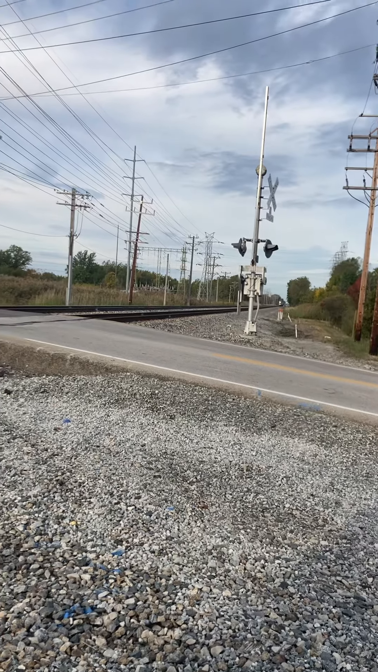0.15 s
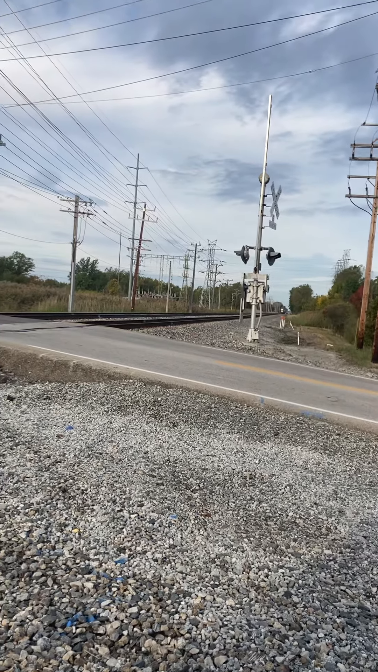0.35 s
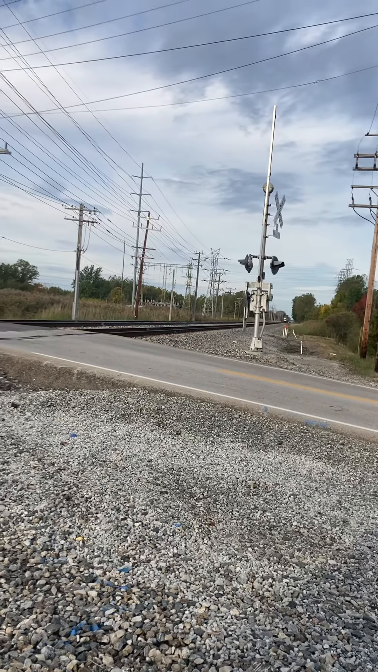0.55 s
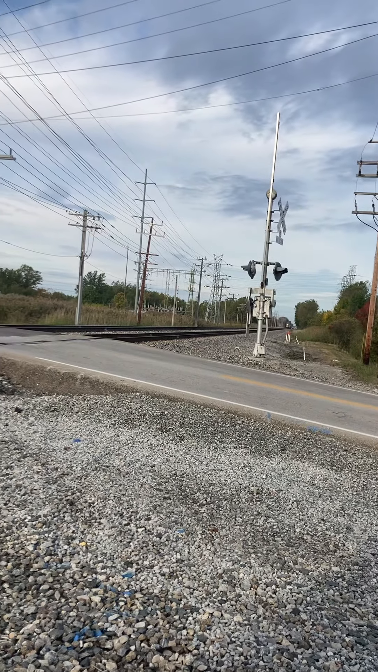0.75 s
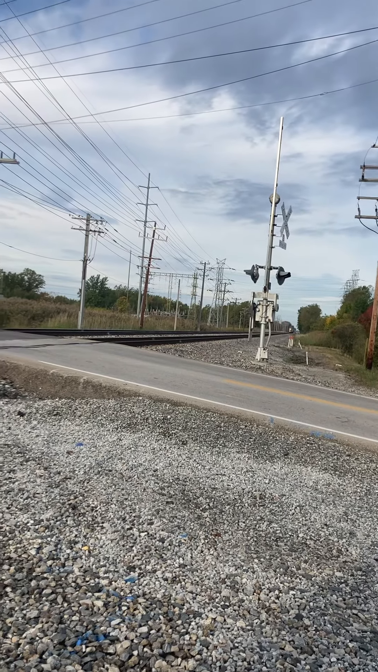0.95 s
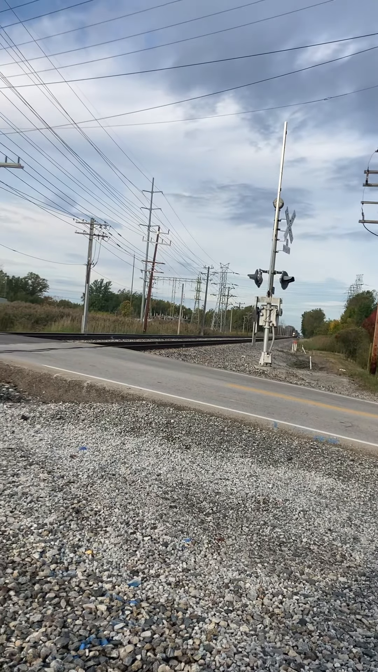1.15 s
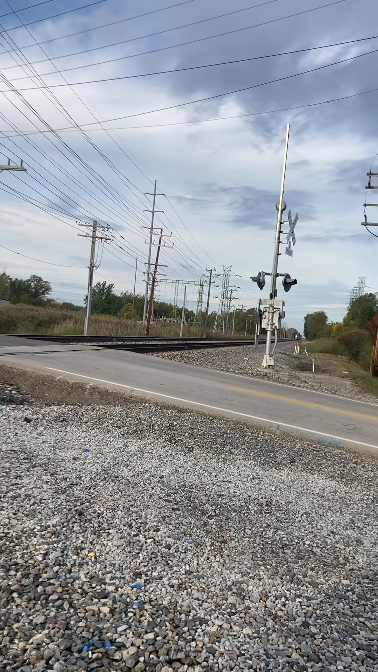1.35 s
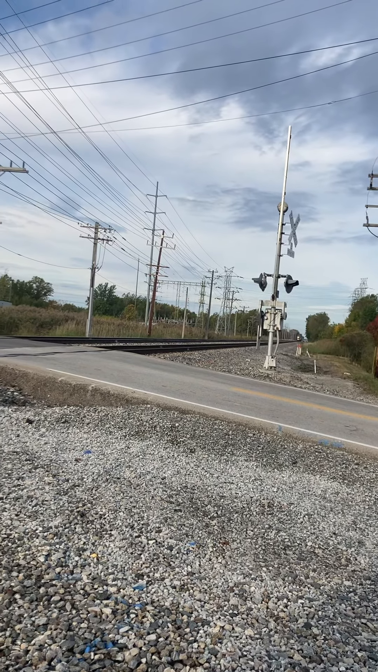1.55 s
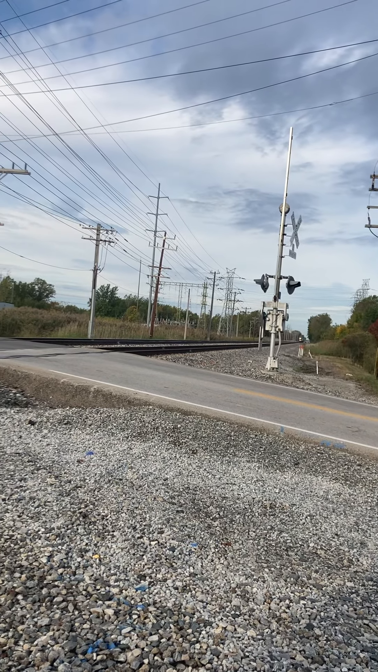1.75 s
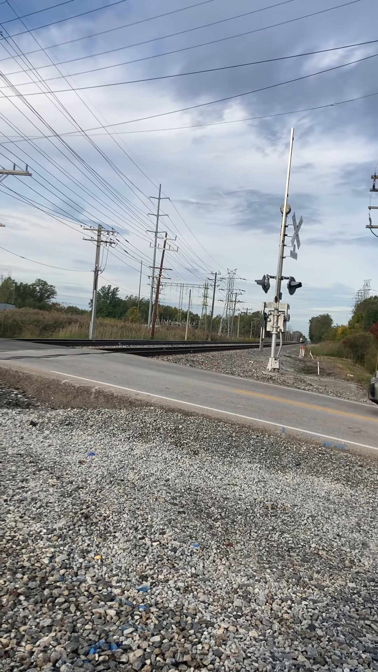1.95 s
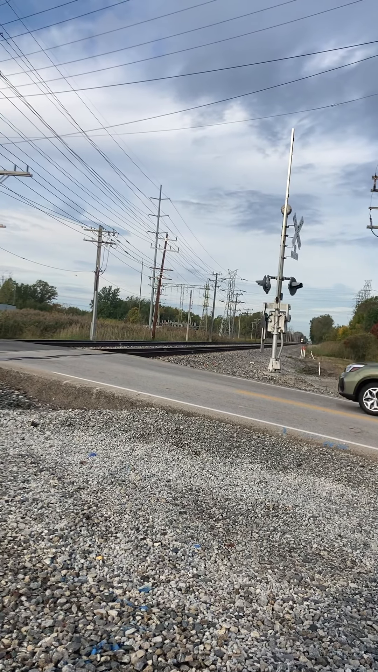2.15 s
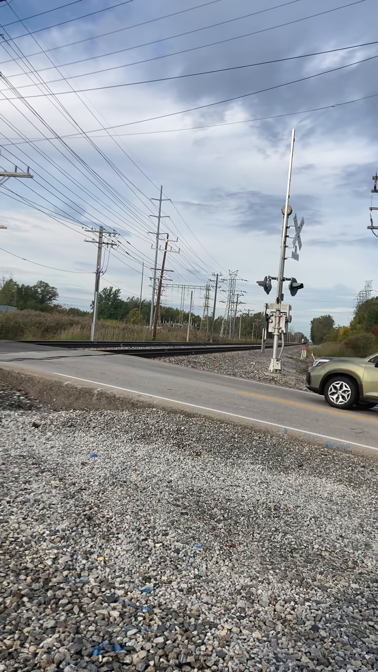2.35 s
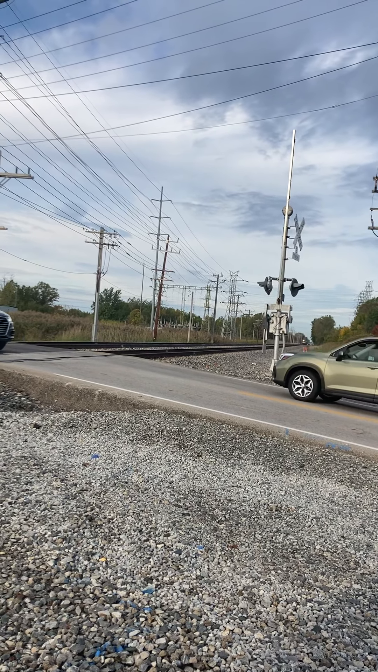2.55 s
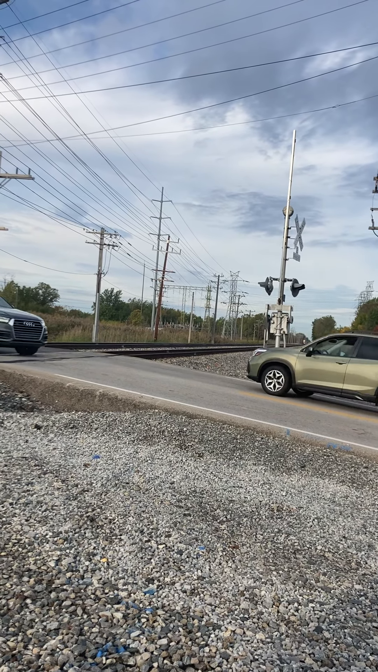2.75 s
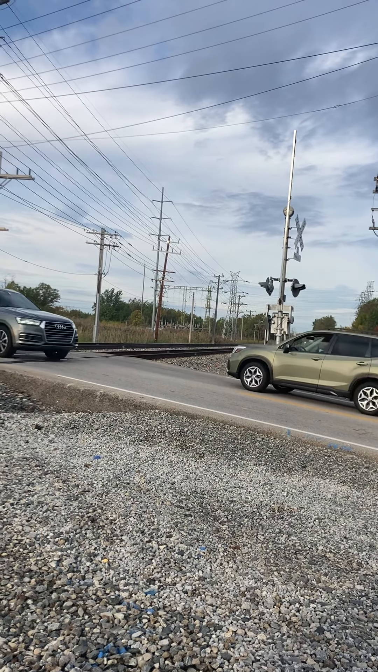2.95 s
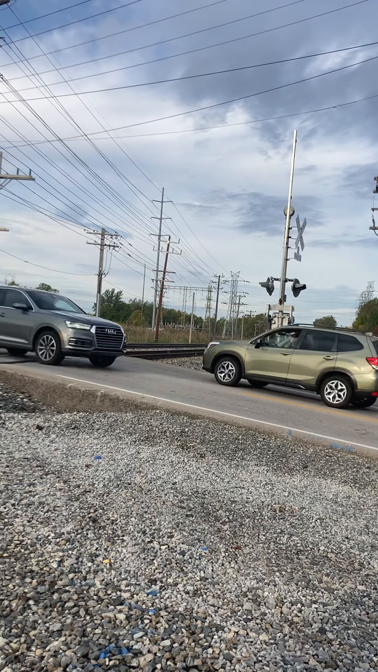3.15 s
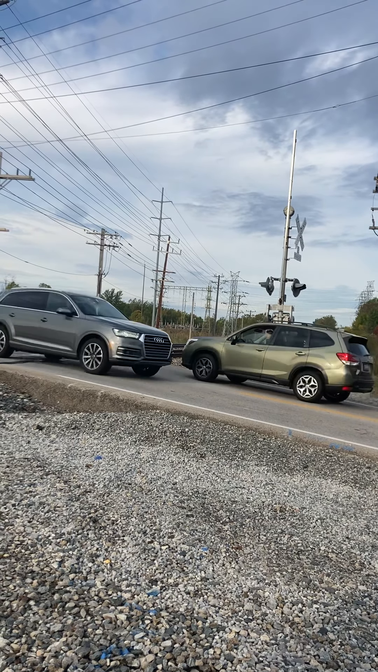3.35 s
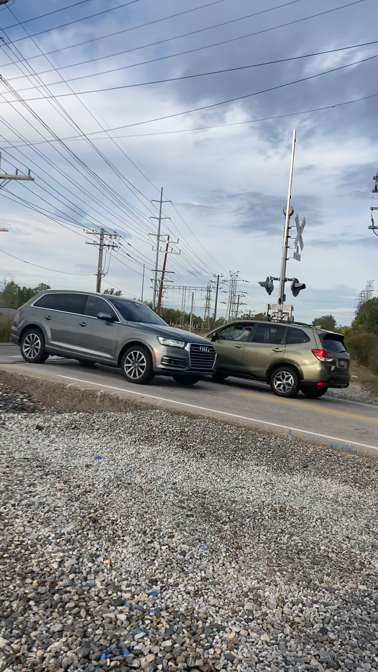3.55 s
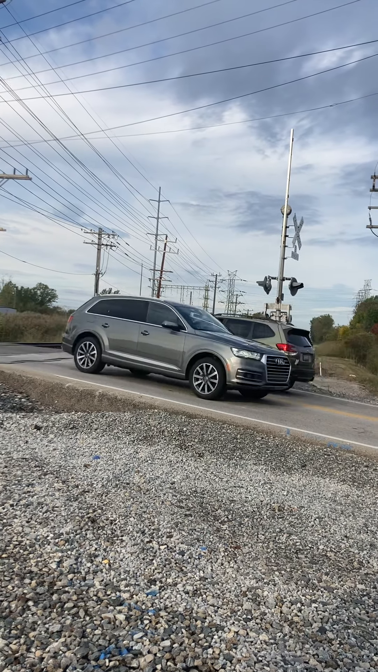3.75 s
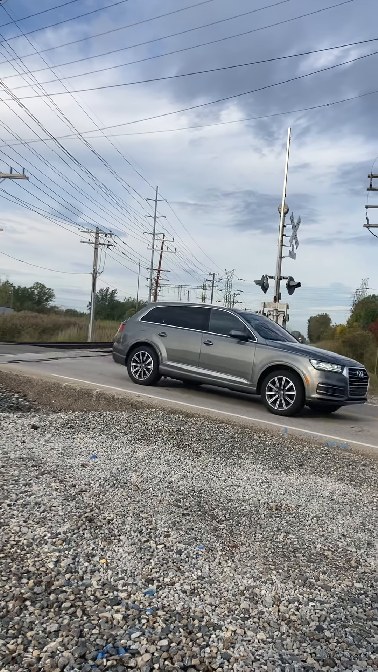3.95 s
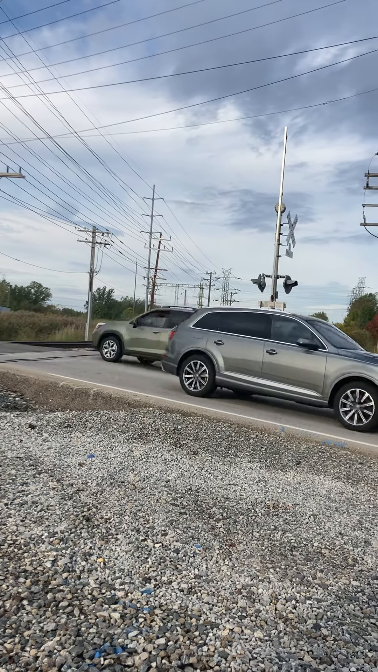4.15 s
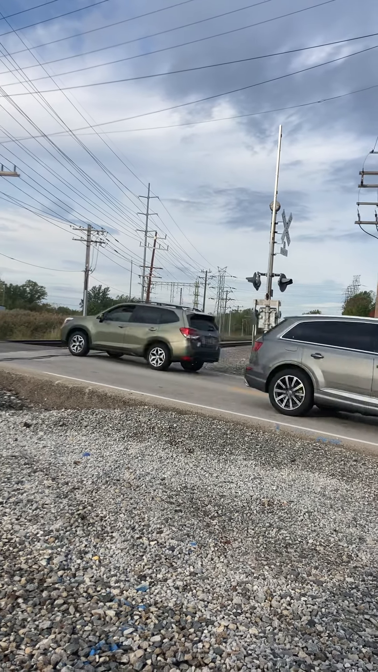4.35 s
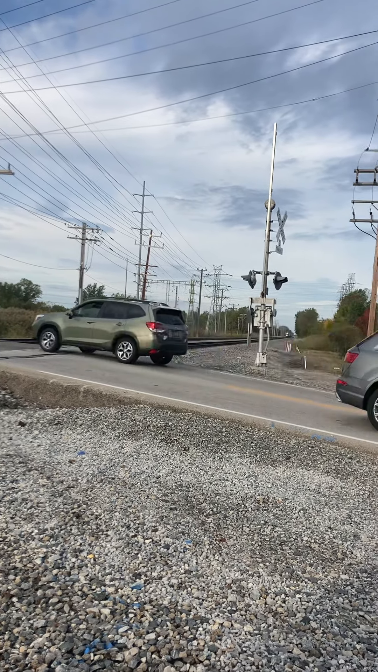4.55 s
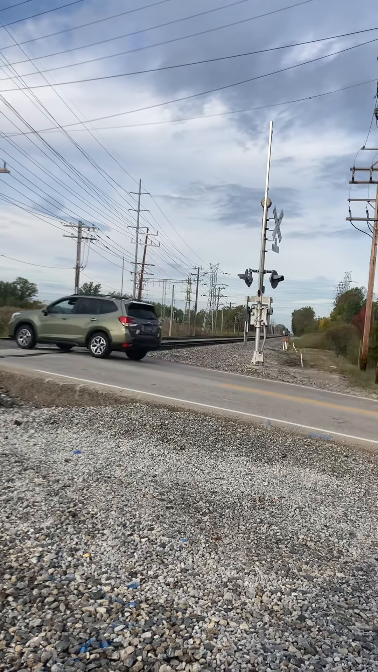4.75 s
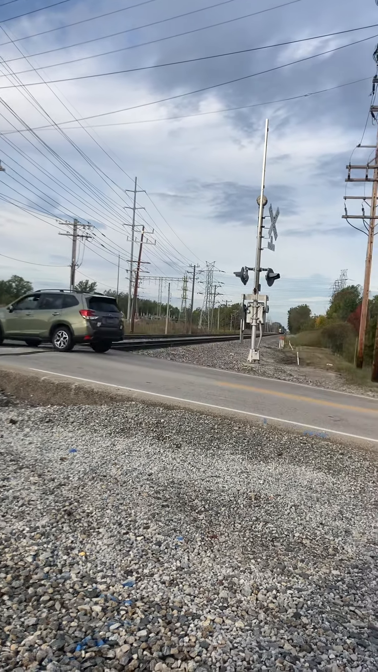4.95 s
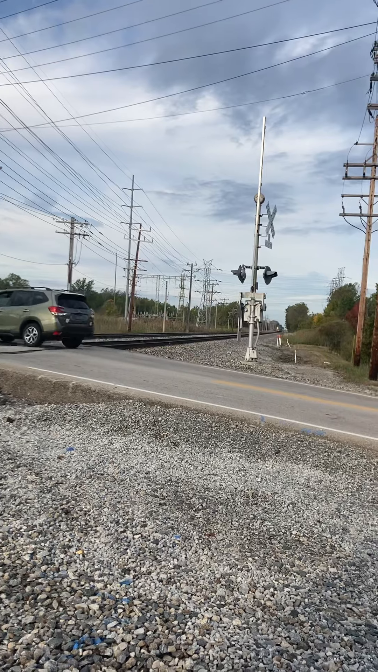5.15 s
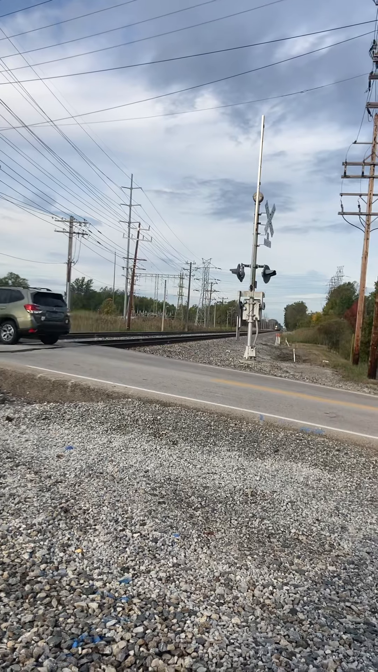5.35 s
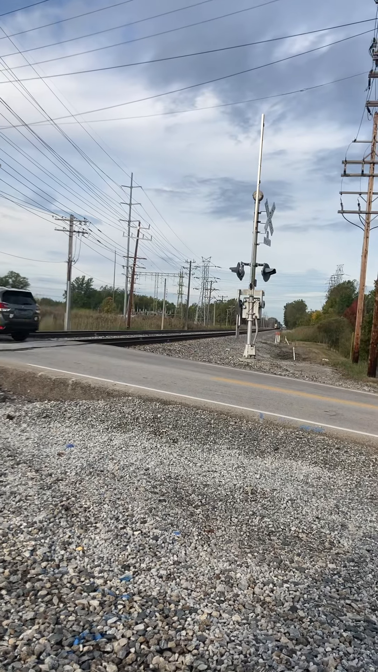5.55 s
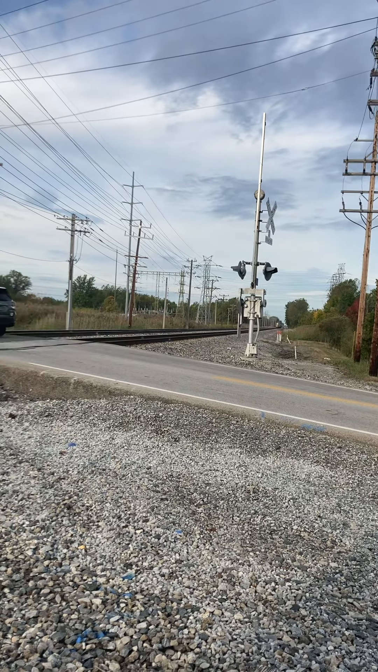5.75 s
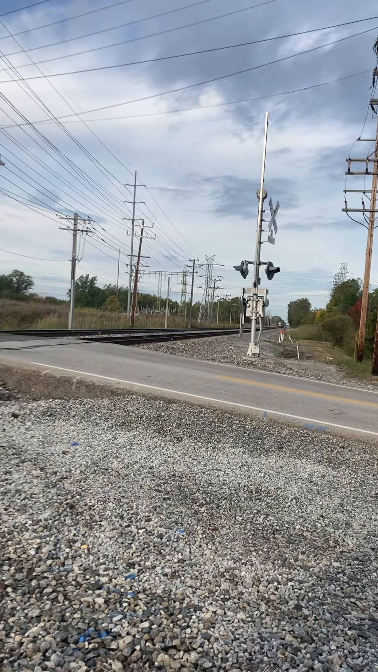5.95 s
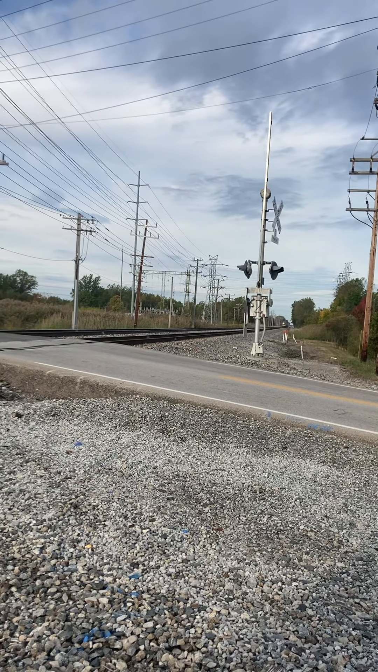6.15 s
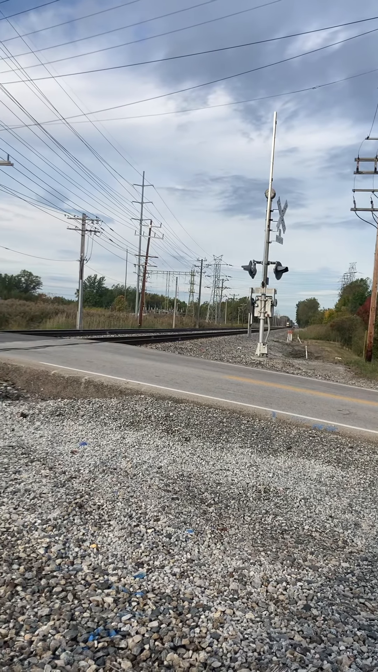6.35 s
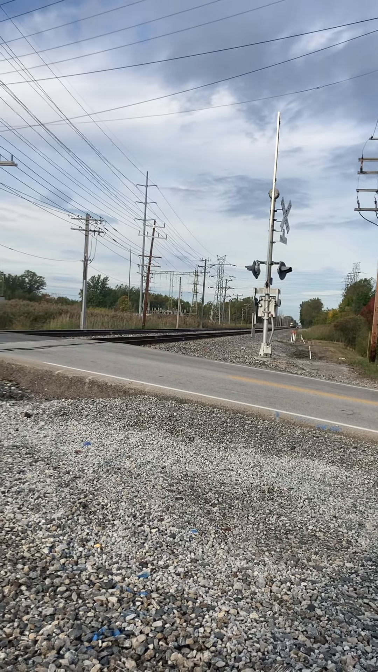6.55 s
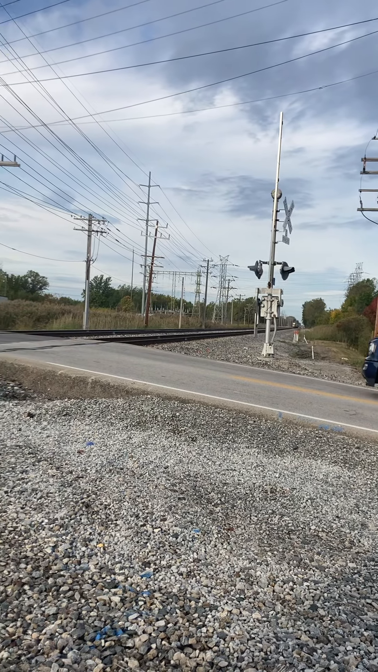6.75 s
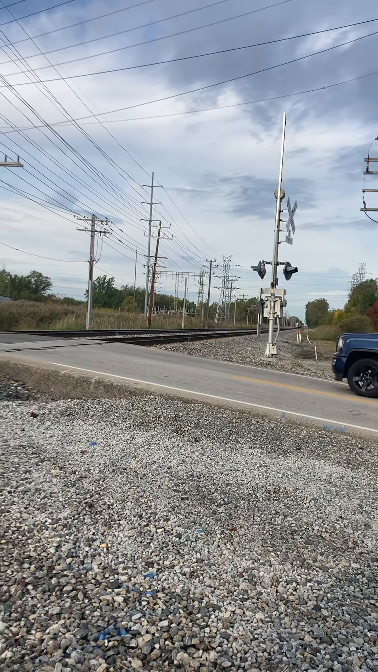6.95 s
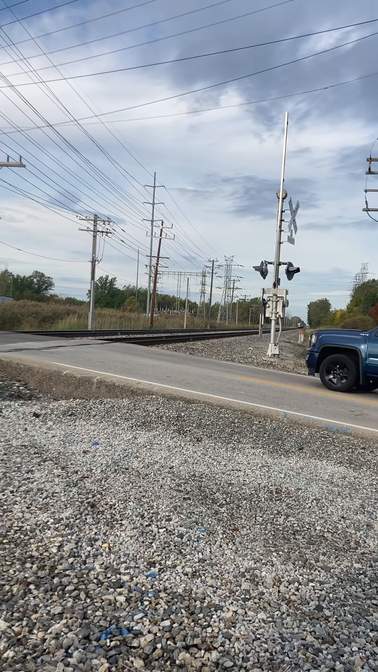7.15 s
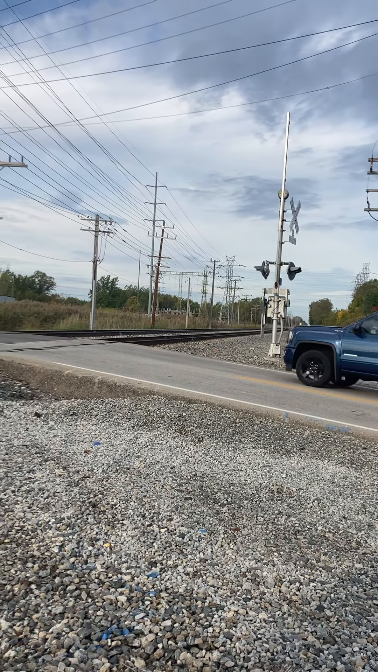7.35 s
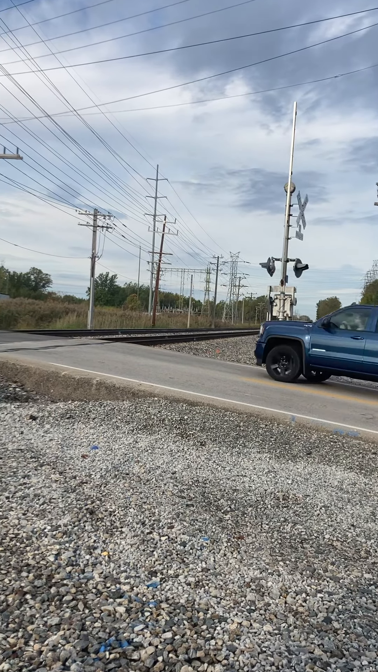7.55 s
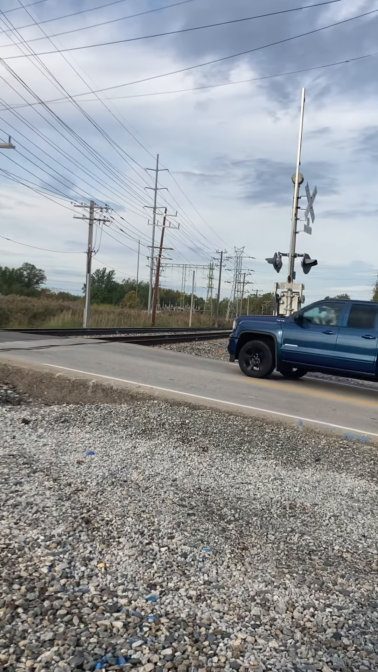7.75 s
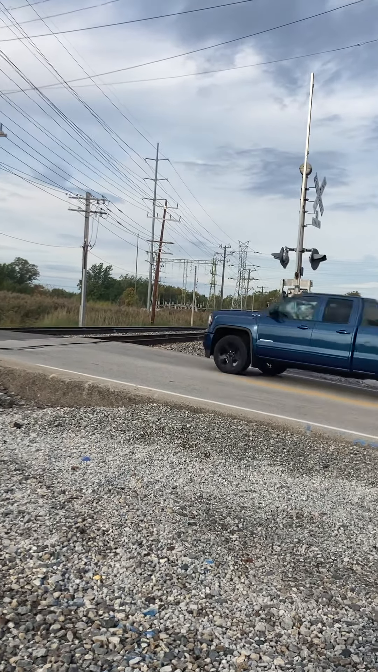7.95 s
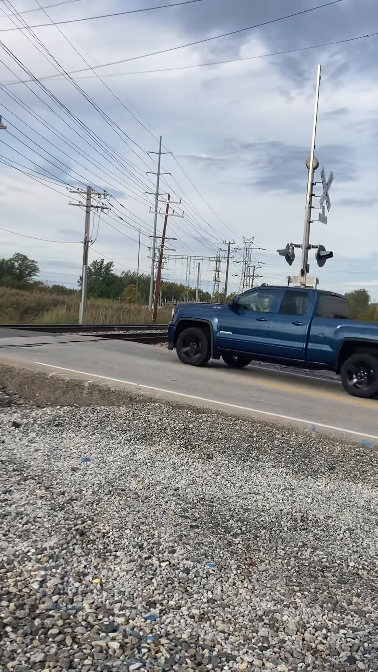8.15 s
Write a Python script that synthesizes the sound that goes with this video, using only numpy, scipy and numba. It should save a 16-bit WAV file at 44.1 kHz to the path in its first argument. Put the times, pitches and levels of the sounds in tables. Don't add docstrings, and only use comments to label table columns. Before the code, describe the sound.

Steady rolling road noise swells into a close pass by two cars in opposite directions, with low beating engine hums, grit ticks and a soft suspension thud. Dull wheel knocks cluster as one crosses the rails, then a pickup pulls up, its engine rising under a faint fan whirr and very faint brake whistle. Cricket chirps stay regular on the left. Open-air phone pickup, close to the verge, with low wind buffets.

```python
import sys
import numpy as np
from scipy import signal
from scipy.fft import rfft, irfft, next_fast_len
from scipy.io import wavfile
from scipy.ndimage import uniform_filter1d
from numba import njit

SR = 44100
rng = np.random.default_rng(int(sys.argv[2]) if len(sys.argv) > 2 else 0)


def elevation(decibels):
    levels = np.asarray(decibels, float)
    return 10 ** (levels / 20)


def output_pcm(signal):
    pcm = np.clip(np.atleast_2d(signal).T, -1, 1) * 32767
    wavfile.write(sys.argv[1], SR, np.round(pcm).astype(np.int16))


N = 361179
T = np.arange(N) / SR

# frequency in Hz, level in dB per band.
ROLL_COLOUR = [(25, -21), (40, -40), (60, -9.5), (110, -11.5), (200, -9.5), (380, -4), (600, -4), (800, 1),
               (1100, -2), (2000, -7), (3000, -4), (5000, -3.5), (9600, -4), (12600, -11.5), (15000, -10)]
# frequency in Hz, level in dB per band.
DISTANT = [(25, -55.5), (60, -54.5), (300, -66), (600, -80), (1100, -64), (1900, -50.5), (2300, -85.5),
           (2700, -97), (16000, -110)]
# frequency in Hz, level in dB.
FAR_ROLL = [(80, -33.5), (380, -43), (640, -45), (800, -44), (1400, -43.5), (2600, -52), (8200, -65.5),
            (14000, -68)]
CAR_ROLL = [(80, -42.5), (380, -46), (800, -50.5), (1400, -51), (3000, -59), (5400, -60), (8200, -58),
            (14000, -59.5)]
PICKUP_ROLL = [(80, -42.5), (380, -48), (800, -40.5), (1400, -45), (3000, -55.5), (5600, -59),
               (8200, -58.5), (14000, -58)]
# time in seconds, nearness in dB.
FAR_WAY = [(0, -9.5), (.9, -10.5), (1.2, -9), (2.05, -4), (2.85, -1.5), (3.6, -2), (4.4, -4.5), (5.0, 0.5),
           (5.8, 2.5), (6.4, 0.5), (7.0, -2), (7.6, -4), (8.19, -4)]
CAR_WAY = [(0, -24), (.8, -17), (1.6, -7.5), (2.9, -6), (3.4, 2.5), (3.75, 0), (4.1, 3.5), (4.6, 2.5),
           (5.1, -1), (5.6, -4), (6.2, -5.5), (8.19, -16)]
# time in seconds, change in dB,
# centre in Hz.
SWELLS = [(.16, -1.5, 200), (1.16, 6, 80), (2.85, 1.5, 900), (3.42, 1, 900), (3.74, 1.5, 80),
          (4.61, 4, 90.06), (4.77, 4.5, 400), (5.11, 5, 80), (5.31, 2, 446.8), (5.86, -1, 80.15),
          (5.87, 1.5, 900), (5.94, 2.5, 383), (6.25, 3, 80), (6.41, 1, 80), (6.48, 4.5, 785), (6.65, 6, 80),
          (6.72, 2.5, 900), (7.55, 1, 800), (7.64, 4, 80), (1.32, 9.5, 70), (1.55, 8, 75), (1.7, 6, 70),
          (1.5, 0, 600), (1.8, -1, 1000), (1.95, -2.5, 900), (1.97, 4, 70), (2.22, 4.5, 75), (2.55, 1, 70),
          (4.63, 1, 1100), (5.97, -13, 50), (6.12, 1.5, 400), (7.03, 2, 70), (7.31, 1, 775), (7.5, -10, 50),
          (7.9, 4.5, 90), (8.15, -9, 40.2), (3.41, 1, 105), (3.5, 0, 1100), (4.39, 1, 280), (5.61, 0, 1100),
          (6.58, 3, 60), (1.3, 1, 1000), (2.35, -1.5, 650), (7.05, -2.5, 280), (2.68, -2, 1100),
          (5.4, -1.5, 1100), (3.2, 1, 200), (5.53, 2, 1400), (7.8, -1.5, 1100), (7.2, 2, 150),
          (6.1, -1, 900)]

# frequency in Hz, width in Hz, level in dB.
SONG = [(1750, 250, -66.5), (2115, 280, -69)]
SHIELD = [(2780, 260, -64)]
FAR_TYRES = [(720.4, 24, -49), (1100, 300, -44.5), (1456, 340, -53), (2380, 630, -61)]
CAR_TYRES = [(255.5, 87, -44.5), (754, 220, -50), (1016, 140, -45.5), (1450, 230, -46.5),
             (1815, 120, -51.5), (2710, 460, -54.5)]
PICKUP_TYRES = [(795, 63, -67), (1072, 230, -41), (1340, 110, -62), (1850, 190, -66)]
# time in seconds, level in dB.
SONG_NEAR = [(0, 2), (.7, -2), (1.5, -1), (2.3, 2), (3.0, 6), (3.7, 6), (4.3, -2), (5, -20)]
SHIELD_NEAR = [(1.0, -14), (1.6, -2), (2.1, 1), (2.9, 1), (3.3, -9), (3.6, -30)]
FAR_NEAR = [(4.2, -32), (4.6, -8), (5.0, 4), (5.3, 3), (5.7, 2), (6.0, -16.5), (6.3, 1), (6.8, -31)]
CAR_NEAR = [(2.5, -40), (3.2, -9.5), (3.45, -1.5), (3.9, 1), (4.4, 2), (4.8, -2.5), (5.2, -11), (5.6, -11)]
PICKUP_NEAR = [(6.2, -11), (6.6, -7), (6.9, -1), (7.3, 0.5), (7.7, 1.5), (8.19, 0)]

# time in seconds, peak in dB.
GUSTS = [(3.9, -35.5), (4.3, -39), (5.3, -42), (5.8, -41.5), (7.15, -33), (7.5, -34.5), (7.9, -37)]
# time of the last stroke in seconds, level in dB, stroke spacing in seconds.
CHIRPS = [(0.215, -55, 0.044), (0.808, -52, 0.045), (1.298, -49.5, 0.046), (1.874, -49, 0.045),
          (2.729, -45.5, 0.042), (3.435, -46, 0.047), (4.042, -46.5, 0.045), (4.891, -47.5, 0.04),
          (5.58, -45, 0.045), (6.187, -46, 0.044), (6.771, -46.5, 0.045), (7.341, -47.5, 0.044),
          (7.847, -46, 0.049)]
# spacings before the last stroke, extra lead in seconds, level in dB,
# starting frequency in Hz, length in seconds.
STROKES = [
    (1, .04, -6, 4740, .018),
    (1, .002, -1.5, 4950, .023),
    (0, .001, -.5, 5000, .025),
]

# time in seconds, peak in dB.
TICKS = [(1.1613, -72), (7.226, -68), (7.552, -65)]
# time in seconds, peak in dB, ring in Hz.
GRIT = [(2.0644, -47, 2600), (2.3087, -41, 2670), (2.4149, -45, 2830), (2.9093, -37, 2790),
        (3.0051, -43, 2910), (3.0315, -40, 2310), (3.4745, -38, 2330), (3.5673, -40, 2370)]
KNOCKS = [(2.188, -28, 409), (2.283, -31, 385), (2.417, -29, 409), (2.656, -29, 415), (2.708, -29, 444),
          (5.316, -26, 315), (5.603, -24, 1050), (5.64, -24, 700), (5.785, -21, 1300), (5.849, -20, 600),
          (5.858, -22, 417), (5.89, -28, 1300), (5.948, -27, 851), (6.129, -20, 760), (6.137, -22, 650),
          (6.146, -21, 500), (6.17, -25, 900), (6.181, -25, 1100)]
THUDS = [(3.878, -19, 46.38), (3.885, -22, 104), (6.489, -17.5, 72.64), (6.54, -26, 61.9), (7.169, -22, 95),
         (7.184, -21.5, 132), (3.93, -15, 105.2), (7.229, -20, 70.5)]

# time in seconds, firing rate in Hz, load in dB, rasp of the upper orders in dB.
CAR = [(2.6, 79.1, -46, -52), (3.2, 88, -42, -54), (3.45, 93, -43, -56), (3.62, 97, -35, -56),
       (3.9, 101.5, -32, -54), (4.1, 105.6, -36, -43), (4.25, 107, -35, -38), (4.42, 98, -36, -42),
       (4.62, 84, -44, -41)]
CAR_NEXT_GEAR = [(4.5, 86.5, -50, -46), (4.59, 85, -47, -35), (4.74, 79.7, -40, -33), (4.9, 80.7, -40, -33),
                 (5.1, 82.3, -33, -34), (5.22, 83.2, -34, -43), (5.45, 85.4, -31.5, -48),
                 (5.62, 85.5, -35, -50), (5.82, 82, -36, -54), (5.93, 80, -50, -60)]
PICKUP = [(6.1, 58, -42, -60), (6.3, 66, -37, -60), (6.55, 62, -32, -56), (6.72, 65, -40, -54),
          (6.85, 63, -35, -60), (7.05, 70, -36, -54), (7.16, 75.5, -50, -50), (7.45, 80.5, -52, -49),
          (7.62, 84.4, -41, -46.5), (7.78, 86, -46, -47), (7.9, 87, -36, -48), (8.1, 86.6, -37, -50),
          (8.3, 85, -38, -52)]
# multiple of the firing rate, level in dB over the rasp.
CAR_ORDERS = [(2, 0)]
CAR_NEXT_GEAR_ORDERS = [(3, 0)]
PICKUP_ORDERS = [(2, -3), (4.5, 0)]
# time in seconds, frequency in Hz, level in dB.
MEETING = [(2.9, 112.3, -44), (3.1, 113.7, -41), (3.5, 117.5, -44.5), (3.7, 112.6, -36.5),
           (4.0, 119.2, -38), (4.3, 120, -44), (4.55, 113.9, -44)]
DRONE = [(4.95, 162, -52), (5.15, 166, -42), (5.4, 171, -42), (5.6, 171, -52)]
FAR_HUM = [(6.2, 112.2, -46), (6.4, 116, -41), (6.88, 125.4, -42), (7.07, 127.5, -42), (7.4, 127.1, -47)]
FAN = [(7.15, 242, -54), (7.45, 253, -51), (7.55, 259, -42), (7.75, 266.5, -43), (7.95, 269, -43),
       (8.08, 266, -42), (8.3, 250, -39)]
SQUEAL = [(7.45, 7330, -80), (7.52, 7329, -72), (7.93, 7317, -73), (8.05, 7310, -80)]

# frequency in Hz, left minus right in dB, right lead in radians,
# likeness from 0 to 1.
PORTS = [(40, 2.5, 0, .75), (120, 3.4, .05, .95), (300, 3.6, .2, .97), (420, 7.5, .8, .88),
         (560, 1.5, 1.6, .96), (680, .8, 1.7, .88), (800, 0, 1.6, .86), (1100, .4, 1.24, .95),
         (1900, .5, .85, .9), (3000, -2.2, 1.9, .72), (4100, 0, 3.1, .35), (4700, 1, 3.7, .3),
         (4950, 0, 3.6, .9), (5650, 0, 3.14, .91), (6200, 0, 2.8, .9), (6500, 0, 2.2, .88),
         (7700, 0, .95, .94), (8650, 0, 0, .94), (12000, 0, -3.14, .995), (14400, 0, -6.1, .985),
         (16000, 0, -6.8, .98)]

AIR_LOSS_PER_OCTAVE = 0.036
SWELL_S, SWELL_OCTAVES = 0.064, 1.18
PATCH_DB, FLICKER_DB, HISS_PATCH_DB = 0.4, 1.7, 0.1
GUST_RISE_DB_S, GUST_FALL_DB_S, CALM_DB = 64, 27, -56
TURN_REST_RAD, TURN_RAD, TURN_AT_S, TURN_RISE_S, TURN_FALL_S = 0.13, 0.9, 4.38, 1.4, 0.92
PICKUP_TURN_RAD, PICKUP_TURN_AT_S, PICKUP_TURN_S = 0.68, 7.52, 0.48
HISS_TURN_RAD, HISS_TURN_AT_S, HISS_TURN_S, HISS_FLUTTER_RAD = -0.2, 4.4, 0.55, 0.28


@njit
def svf(x, hz, width_hz):
    y, band, low = np.empty(len(x)), 0., 0.
    g, k = np.tan(np.pi * hz / SR), width_hz / hz
    for i in range(len(x)):
        v = (band + g * (x[i] - low)) / (1 + g * (g + k))
        band, low, y[i] = 2 * v - band, low + 2 * g * v, k * v
    return y


def unit(x):
    return x / np.sqrt(np.mean(x ** 2))


def band_noise(hz, width_hz):
    once = svf(rng.standard_normal(N), 1. * hz, 1. * width_hz)
    return unit(svf(once, 1. * hz, 1. * width_hz))


def walk(rate_hz):
    hold = int(SR / rate_hz)
    steps = np.repeat(rng.standard_normal(N // hold + 1), hold)
    return 1.3 * uniform_filter1d(uniform_filter1d(steps, hold), hold)[:N]


def columns(table):
    s, *rest = np.transpose(table)
    return [np.interp(T, s, c) for c in rest]


def colour(points, hz):
    point_hz, db = np.transpose(points)
    return np.interp(np.log(hz), np.log(point_hz), db)


def swing(at_s, width_s):
    return np.exp(-((T - at_s) / width_s) ** 2)


def add(out, s, x):
    i = int(s * SR)
    out[i:i + len(x)] += x[:N - i]


def road():
    out, patch, t = np.zeros((2, N)), walk(13), T[::64]
    vehicles = ((FAR_ROLL, FAR_WAY), (CAR_ROLL, CAR_WAY), (PICKUP_ROLL, PICKUP_NEAR))
    traffic = [(roll, columns(near)[0][::64]) for roll, near in vehicles]
    for hz in 25 * 2 ** (np.arange(29) / 3):
        fading = 1 + AIR_LOSS_PER_OCTAVE * np.log2(hz / 400)
        rolling = np.sqrt(sum(elevation(colour(roll, hz) + fading * near_db) ** 2 for roll, near_db in traffic))
        swell_db = 0
        for s, db, centre_hz in SWELLS:
            octaves = np.log2(hz / centre_hz)
            swell_db = swell_db + db * np.exp(-((t - s) / SWELL_S) ** 2 - (octaves / SWELL_OCTAVES) ** 2)
        patch_db = (PATCH_DB + HISS_PATCH_DB * (hz > 5000)) * patch
        flicker_db = FLICKER_DB * walk(8) / (1 + (hz / 11000) ** 4)
        level_db = colour(ROLL_COLOUR, hz) + swell_db + (patch_db + flicker_db)[::64]
        gain = np.hypot(rolling * elevation(level_db), elevation(colour(DISTANT, hz)))
        gain = np.interp(T, t, gain)
        for row in out:
            row += gain * band_noise(hz, hz / 3)
    return out


def tyres(modes, near):
    rings = sum(elevation(db + walk(7)) * band_noise(hz, width_hz) for hz, width_hz, db in modes)
    return elevation(columns(near)[0]) * rings


def wind():
    gusts_db = [db - np.where(T < s, GUST_RISE_DB_S * (s - T), GUST_FALL_DB_S * (T - s)) for s, db in GUSTS]
    gust_db = np.maximum(np.max(gusts_db, axis=0), CALM_DB)
    puffs = []
    for _ in range(2):
        rumble = svf(svf(rng.standard_normal(N), 73.0, 67.0), 55.0, 100.0)
        puffs.append(unit(rumble) * elevation(1.3 * walk(13)))
    return elevation(gust_db) * np.array(puffs)


def cricket():
    out, chance = np.zeros(N), rng.standard_normal((len(CHIRPS), len(STROKES), 2))
    for (s, db, gap_s), lucks in zip(CHIRPS, chance):
        for (gaps, early_s, rel_db, top_hz, length_s), (sharp, strong) in zip(STROKES, lucks):
            t = T[:int(length_s * SR)]
            hz = top_hz + 40 * sharp - 5000 * t - 850000 * t ** 2
            tone = np.sin(2 * np.pi * np.cumsum(hz) / SR)
            swell = np.sin(np.pi * (t / length_s) ** .8) ** 1.2
            add(out, s - gaps * gap_s - early_s, elevation(db + rel_db + 1.4 * strong) * swell * tone)
    return out


def hits(table, t60_s, push_s, noise, spread, trim_db):
    out, t = np.zeros(N), T[:6000]
    shape = (1 - np.exp(-t / push_s)) ** 2 * np.exp(-np.log(1000) * t / t60_s)
    shape = shape / shape.max()
    for s, db, hz in table:
        crack = rng.standard_normal(len(t))
        for _ in range(3):
            crack = svf(crack, 1. * hz, spread * hz)
        ring = np.sin(2 * np.pi * hz * t)
        add(out, s, elevation(db + trim_db) * (ring + noise * unit(crack)) * shape)
    return out


def dry_ticks():
    table = [(s, db, 12000) for s, db in TICKS]
    return hits(table, t60_s=.012, push_s=.0002, noise=3., spread=.2, trim_db=-4.)


def grit():
    return hits(GRIT, t60_s=.04, push_s=.0008, noise=.7, spread=.4, trim_db=-3.)


def rail_knocks():
    return hits(KNOCKS, t60_s=.045, push_s=.0012, noise=.8, spread=.8, trim_db=-9.5)


def suspension_thuds():
    return hits(THUDS, t60_s=.053, push_s=.008, noise=.067, spread=.37, trim_db=-6.5)


def engine(table, orders, lump_db):
    hz, load_db, *rasp_db = columns(table)
    wobble = .2 / table[0][1] ** .8
    phase = 2 * np.pi * np.cumsum(hz * (1 + wobble * walk(12))) / SR
    heard = uniform_filter1d(((T > table[0][0]) & (T < table[-1][0])) * 1., size=2500)
    lines = [(1, load_db)] + [(k, rasp_db[0] + db) for k, db in orders]
    total = 0
    for k, db in lines:
        uneven_db = .9 * walk(9) + lump_db / k * walk(28)
        total = total + elevation(db + uneven_db) * np.sin(k * phase)
    return elevation(-.7 - lump_db / 4) * np.sqrt(2) * heard * total


def engines():
    cars = engine(CAR, CAR_ORDERS, 1.2) + engine(MEETING, [], 2)
    cars = cars + engine(CAR_NEXT_GEAR, CAR_NEXT_GEAR_ORDERS, 1) + engine(DRONE, [], 1.5)
    cars = cars + engine(FAR_HUM, [], 2)
    return cars + engine(PICKUP, PICKUP_ORDERS, 1.5) + engine(FAN, [], 2.5) + engine(SQUEAL, [], 2)


def ports(shared, scattered):
    size = next_fast_len(N)
    f = np.arange(size // 2 + 1) * SR / size
    port_hz, *curves = np.transpose(PORTS)
    step_db, lead_rad, like = (np.interp(f, port_hz, c) for c in curves)
    like = np.clip(like, 0, 1)
    same = rfft(shared, size) * np.sqrt((1 + like) / 2)
    apart = rfft(scattered, size) * np.sqrt((1 - like) / 2)
    left = irfft((same + apart) * elevation(step_db / 2), size)[:N]
    right = (same - apart) * elevation(-step_db / 2) * np.exp(1j * lead_rad)

    def rotate(band, angle_rad):
        direct = irfft(right * band, size)[:N]
        quadrature = irfft(1j * right * band, size)[:N]
        return direct * np.cos(angle_rad) + quadrature * np.sin(angle_rad)

    tread = 1 / (1 + ((f - 570) / 100) ** 4)
    hiss = 1 / (1 + ((f - 5500) / 800) ** 4)
    car_width_s = np.where(T < TURN_AT_S, TURN_RISE_S, TURN_FALL_S)
    tread_rad = TURN_REST_RAD + TURN_RAD * swing(TURN_AT_S, car_width_s)
    tread_rad = tread_rad + PICKUP_TURN_RAD * swing(PICKUP_TURN_AT_S, PICKUP_TURN_S)
    hiss_rad = HISS_TURN_RAD * swing(HISS_TURN_AT_S, HISS_TURN_S) + HISS_FLUTTER_RAD * walk(18)
    rest = irfft(right * (1 - tread - hiss), size)[:N]
    return np.array([left, rest + rotate(tread, tread_rad) + rotate(hiss, hiss_rad)])


def scene():
    shared, scattered = road()
    shared = shared + tyres(SONG, SONG_NEAR) + tyres(SHIELD, SHIELD_NEAR) + tyres(FAR_TYRES, FAR_NEAR)
    shared = shared + tyres(CAR_TYRES, CAR_NEAR) + tyres(PICKUP_TYRES, PICKUP_NEAR)
    shared = shared + grit() + rail_knocks() + suspension_thuds() + engines()
    cricket_gain = elevation(np.array([[.1], [-11.]]))
    return ports(shared, scattered) + dry_ticks() + cricket() * cricket_gain + wind()


def roll_off(x):
    return signal.sosfilt(signal.butter(12, 15740, fs=SR, output="sos"), x)


def record(dry):
    bass_cut = signal.butter(4, 38, "high", fs=SR, output="sos")
    mix = signal.sosfilt(bass_cut, dry)
    return roll_off(mix)


dry = scene()
out = record(dry)
output_pcm(out)
```